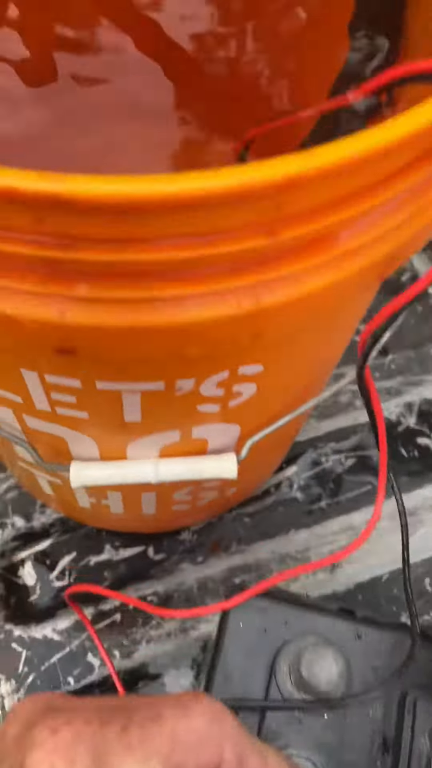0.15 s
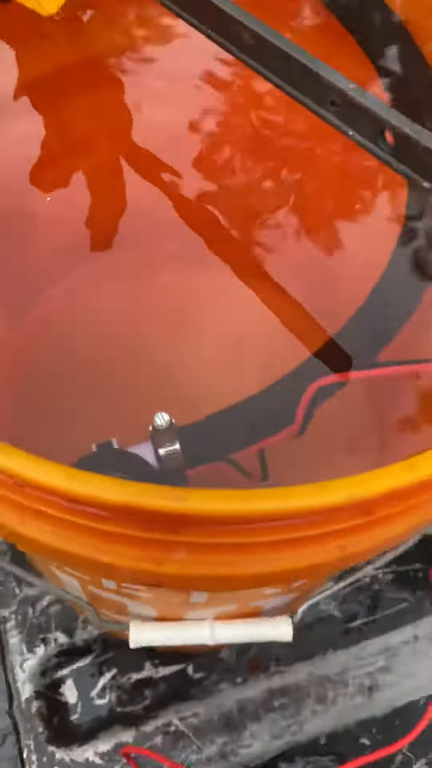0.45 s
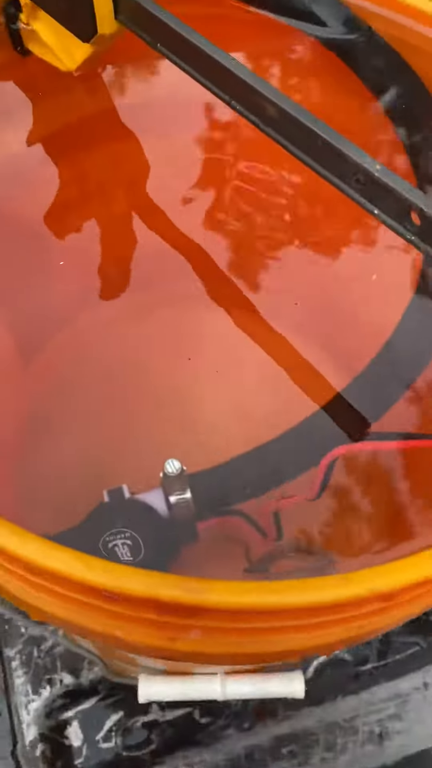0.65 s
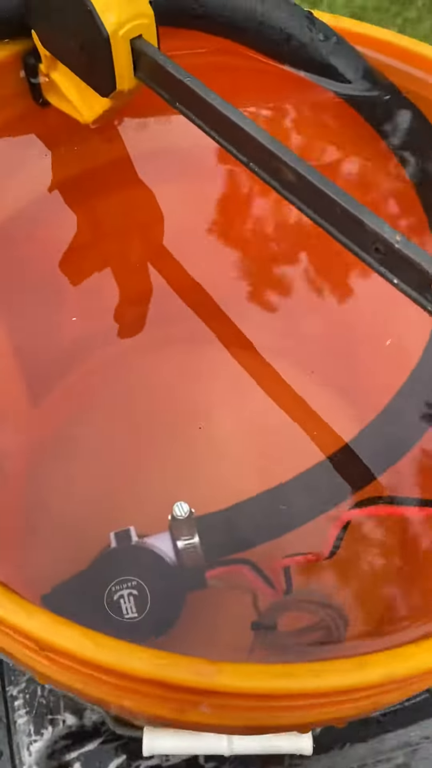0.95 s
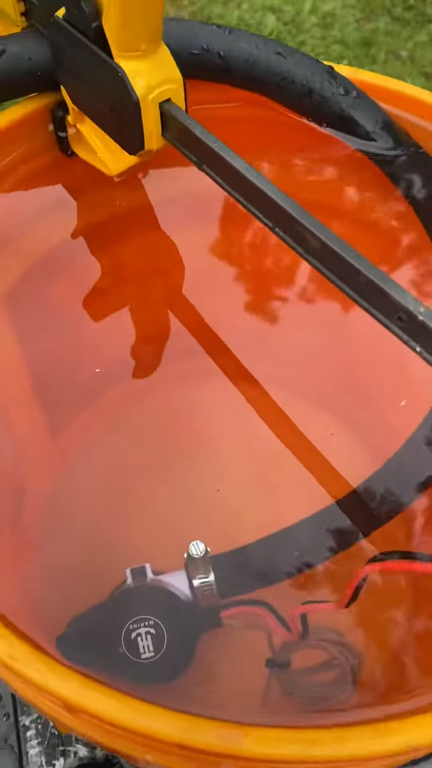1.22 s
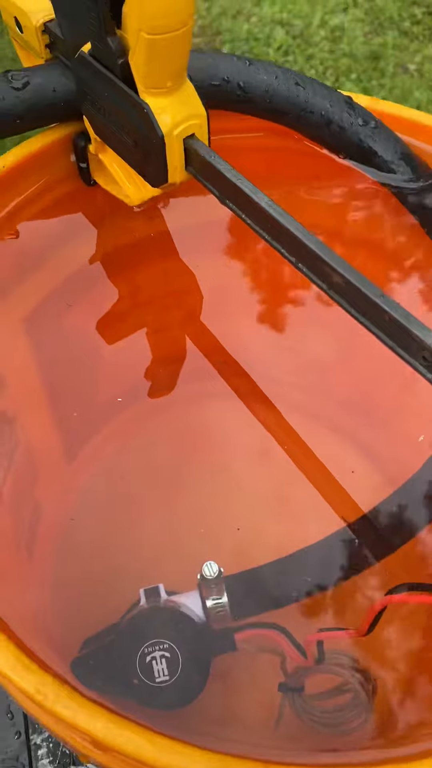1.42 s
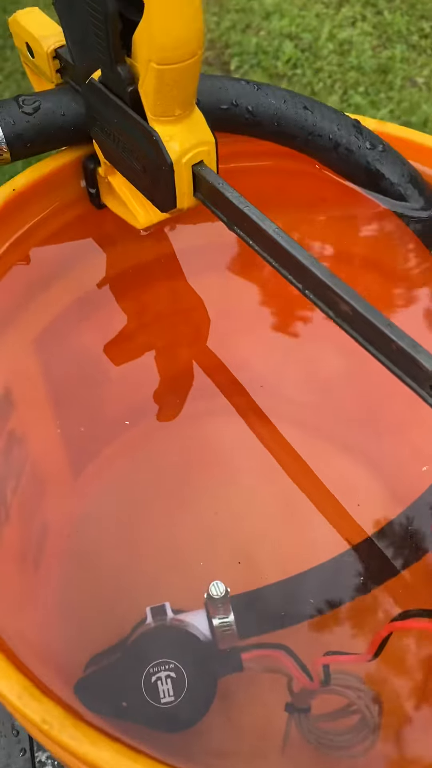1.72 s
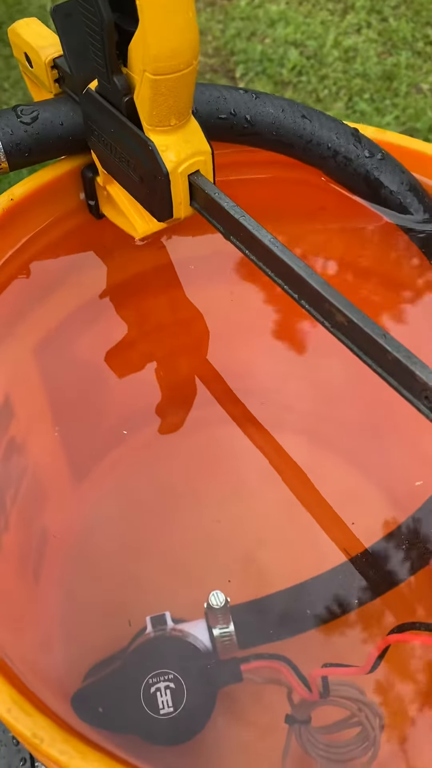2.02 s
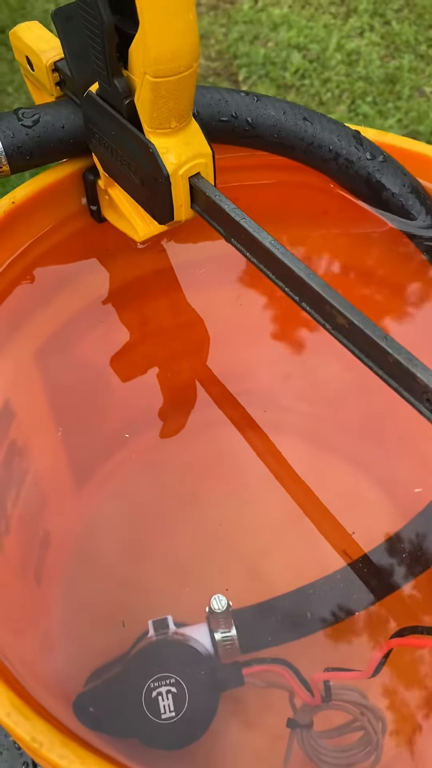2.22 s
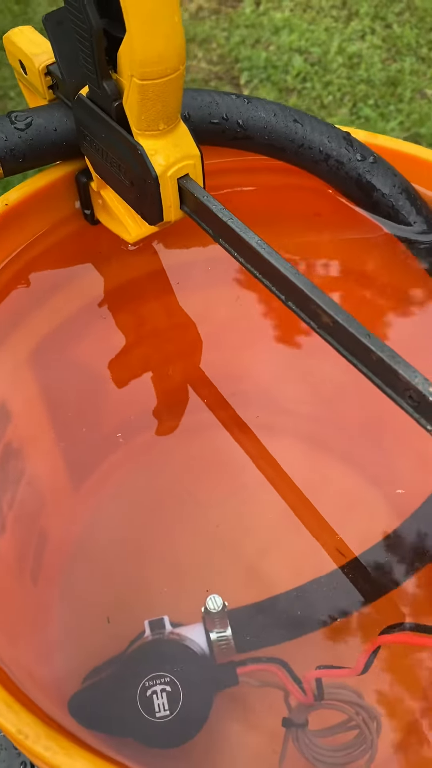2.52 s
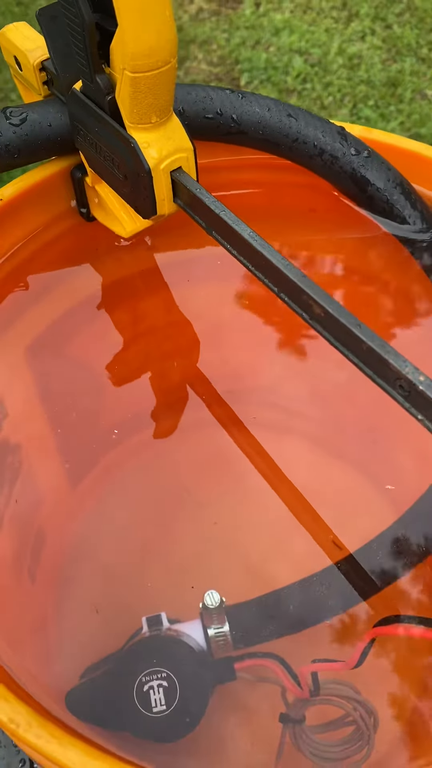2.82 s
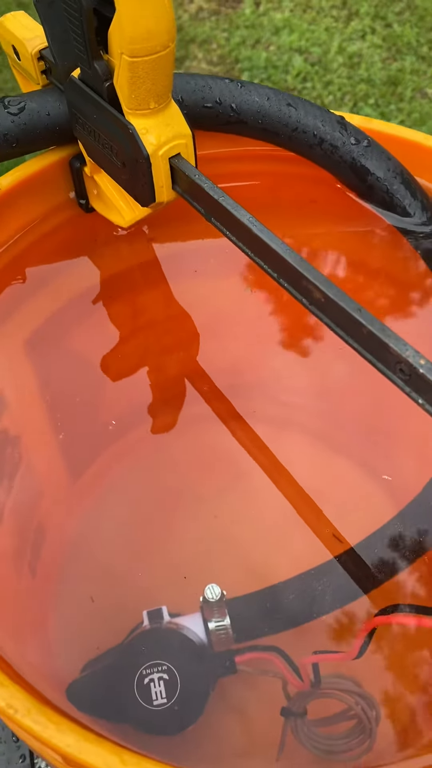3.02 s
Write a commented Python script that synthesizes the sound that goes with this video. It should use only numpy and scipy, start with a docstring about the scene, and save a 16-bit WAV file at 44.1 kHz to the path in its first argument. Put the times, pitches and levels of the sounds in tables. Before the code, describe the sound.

A small electric pump hums in a plastic bucket of water for the whole three seconds, with a hollow churn, faint whine and soft fizz from the hose. At about 0.1 seconds a wire terminal gives a quick, louder double knock on a battery post, then crackles until about 0.3 seconds. The pump runs on steadily, with a few faint ticks and small bubbles, the clearest around 2.3 seconds.

```python
"""A low hum and watery churn: a small electric bilge pump runs in a plastic bucket of water, outdoors.
Its shaft hums, the churned water booms in the bucket and the hose stream fizzes, with a few bubbles.
Just after the start a wire terminal gives a quick double knock on the battery post,
then crackles as it is pressed home."""
import sys
import numpy as np
from scipy import signal
from scipy.fft import rfft, irfft
from scipy.io import wavfile

SR = 44100
rng = np.random.default_rng(int(sys.argv[2]) if len(sys.argv) > 2 else 0)


def unload_wav(signal):
    """Save mono or channel-first audio to the path in sys.argv[1] as 16-bit WAV at rate SR, clipped to [-1, 1]."""
    wavfile.write(
        sys.argv[1],
        SR,
        np.round(np.clip(np.atleast_2d(signal).T, -1, 1) * 32767).astype(np.int16),
    )


N = 139356
TIME, FREQ = np.arange(N) / SR, np.fft.rfftfreq(N, 1 / SR)

# motor speed: time_s, turns_per_s
SHAFT_SPEED = [(0, 54.1), (.25, 54.55), (.75, 54.75), (1.2, 54.87), (1.45, 55.08), (2.3, 55.05),
               (3.16, 55.07)]
# partials of the hum: shaft_multiple, level_db, unsteadiness (0-1), fade_db_per_s
HUM_PARTIALS = [(1, -55, .7, 0), (2, -42.8, .36, 0), (3, -60, .6, 0), (4, -53, .6, 0), (5, -52, .6, 1),
                (7, -54, .8, 0), (8, -53.5, .5, 0), (12, -65, .4, -1.5), (14, -51, .6, 4),
                (20, -50.5, .15, .5), (22, -60.5, .4, -.3)]
# the hum swells at the knocks, ducks just after, then recovers and holds nearly steady: time_s, gain_db
HUM_FADER = [(0, -2), (.1, 4.5), (.2, -8.5), (.4, -5.5), (.7, 0), (1.3, 1.5), (1.7, 0.5), (2.2, -1.5),
             (3.16, -0.5)]
# thin motor whines: pitch_hz, width_hz, level_db, fade_db_per_s
WHINES = [(2820, 220, -59, 0), (3150, 160, -62, -1), (5480, 200, -69, 0), (7400, 100, -69, 0),
          (8920, 90, -69, -1.5), (9570, 110, -62, 3)]
# resonances of bucket and pump: pitch_hz, width_hz, level_db, fade_db_per_s
BUCKET_MODES = [(50.4, 6.1, -57, -2.5), (74.7, 7.5, -57.5, -4), (221, 33, -51, 0), (271, 44, -54, -0.5),
                (348, 35, -55, -2), (402, 92, -51.5, -1), (450, 29, -52, 0.5), (540, 43, -56.5, 1.3),
                (670, 60, -54.5, -0.5), (1028, 190, -50, 0.5), (1213, 120, -55.5, 0.5),
                (1864, 88, -53.5, -0.6), (2060, 370, -49, 0.55)]
# strength of the churning: time_s, gain_db
CHURN_FADER = [(0, -1.5), (.2, 0), (.3, 2), (.8, 1.5), (1.2, 0.4), (1.63, 0.7), (1.8, -1), (2.1, -0.5),
               (2.5, -2), (3.16, -3.5)]
# the water column's drone, swelling and sinking: time_s, level_db
DRONE_FADER = [(0, -41.5), (.12, -43), (.26, -50), (.43, -41), (.6, -47.5), (.85, -45.5), (1.1, -50.5),
               (1.5, -56), (1.63, -38.5), (1.76, -46), (2, -48.5), (2.12, -46.5), (2.37, -56),
               (2.56, -43.5), (2.85, -50.5), (3.16, -45)]
# the bucket's hollow ring comes in quickly, holds, then wavers away: time_s, level_db
HOLLOW_FADER = [(0, -75), (.2, -48), (.9, -48.5), (1.6, -47.5), (2.1, -53.5), (2.33, -45.5), (2.55, -61),
                (2.7, -52.5), (3.16, -68)]
# broad rumble of moving water: freq_hz, density_db
RUMBLE_EQ = [(20, -100), (35, -96), (50, -73.5), (130, -65.5), (190, -71), (340, -78), (500, -75),
             (590, -84.5), (820, -74), (890, -81), (1300, -77.5), (1700, -78), (2200, -95), (2600, -100),
             (5000, -125)]
# fizz of the stream: freq_hz, density_db
FIZZ_EQ = [(300, -100), (2000, -86), (2550, -83), (3050, -81), (4500, -80.7), (5500, -85), (6100, -88.5),
           (7300, -88.7), (8400, -90), (9500, -89.7), (10100, -94), (12000, -94.2), (14300, -92.3),
           (15700, -93.5), (15950, -120)]
# fader on the fizz as the microphone comes over the rim: time_s, gain_db
FIZZ_FADER = [(0, -5.5), (.09, -2.5), (.25, -1.5), (.6, -2), (1.1, 0.14), (2, 0.1), (3.16, 0)]
# terminal hits on the post: start_s, level_db, contact_s, tilt_db_per_octave, ping_gain_db, ping_hz
POST_HITS = [(.0983, -4, 0.0027, 3.5, -6.5, 3400), (0.1086, -6.5, 0.0023, 1, 0, 3080)]
# ring of the battery case: pitch_hz, gain_db, t60_s
CASE_MODES = [(1480, -16, 0.014), (2000, -3.5, 0.0096), (2543, -10.5, .016), (3670, -11, 0.017),
              (4350, -25, .012), (4800, -29, 0.013)]
# low thud of the heavy battery: pitch_hz, gain_db, t60_s
THUD_MODES = [(95, -32, 0.17), (242, -23, 0.051), (389, -26, 0.061), (536, -27.5, 0.22), (778, -28.5, 0.12),
              (1223, -20.5, 0.03)]
# contact crackles and ticks: start_s, level_db, hold_s, tilt_db_per_octave, ring_gain_db
CONTACT_TICKS = [(.1052, -25, .0035, 4, -20), (.126, -29, .0018, -12, -6), (.1404, -35.5, .005, 9, -25),
                 (.1752, -32, .0022, -2, -6), (.1895, -30, .0015, 4.5, -12), (.1982, -23, .0036, -1.5, 2),
                 (.2046, -31, .0012, -2, -2), (.2109, -22, .0012, -9, 3), (.2133, -24, .0008, -4, 4),
                 (.2721, -28, .0015, 2.5, 0), (.2795, -34, .003, -1, -6), (.292, -33, .002, 1, -5),
                 (.3003, -32, .0008, 10, -20), (.3161, -26, .0008, 4, -6), (.3203, -31, .002, 2, 2),
                 (.437, -36, .001, 4, -15), (.819, -35.5, .0008, 8, -20), (.9445, -36.5, .005, 0, -12),
                 (1.386, -45, .001, 20, -30)]
# tone colour of a crackle: freq_hz, gain_db
CRACKLE_EQ = [(500, -31), (2100, -7.5), (2600, 0), (3100, 2), (3900, -1), (4800, 0.5), (5700, -1),
              (6800, 2), (9300, -6), (10800, -14.5), (15500, -20)]
# ring of the scraped metal terminal: pitch_hz, gain_db, t60_s
TERMINAL_MODES = [(2837, -5, 0.016), (4720, -8, 0.028), (5450, -7.5, 0.019)]
# single bubbles: start_s, ring_db, pitch_hz, plop_db
BUBBLE_CUES = [(.0668, -26, 2090, -38), (.3813, -35, 2090, -42), (.7237, -37, 1700, -33.5),
               (.808, -35, 1860, -39), (2.032, -33, 1900, -42), (2.2808, -23, 1900, -36),
               (2.2888, -29, 1870, -37), (2.292, -33.5, 1160, -41), (2.496, -39, 4550, -50)]
# stereo image at the two microphone ports: freq_hz, left_lead_rad, likeness (0-1)
PORT_IMAGE = [(20, 0, 1), (200, 0, .999), (550, -.2, .93), (750, 0, .96), (1100, 0, .98), (2100, 0, .99),
              (2400, .4, .65), (2700, 1.65, .68), (3600, 1.2, .7), (4600, 1.1, .7), (5000, .35, .78),
              (5400, .55, .78), (6000, 1.65, .68), (6600, 3.02, .98), (7300, 3.14, .998), (8000, 3.3, .98),
              (8600, 4.3, .72), (9900, 6.2, .99), (10900, 6.3, .99), (11900, 7.5, .62), (12700, 9.3, .98),
              (13500, 9.42, .997), (14200, 9.55, .97), (15000, 10.8, .6), (16000, 12.2, .75)]
# image of the knocks, arriving from close below: freq_hz, left_lead_rad, left_minus_right_db
KNOCK_IMAGE = [(200, 0, 0), (650, -.3, 4), (1050, -1.2, -7), (1500, -.4, -8), (2000, .55, 0),
               (2500, 1.2, -5), (3100, 1.75, 2), (3800, 2.6, 3), (5000, 0, 0)]


def motor(wobble=.0019, wobble_hz=22.3, flutter_hz=7.2, whine_onset_s=.4):
    """Shaft harmonics flutter as water moves around the pump; thin whines fade in on top."""
    turns = np.cumsum(curve(SHAFT_SPEED) * (1 + wobble * drift(wobble_hz))) / SR
    hum = np.zeros(N)
    for multiple, db, unsteady, fade_db in HUM_PARTIALS:
        steady = np.sqrt(2 * (1 - unsteady ** 2))
        flutter = unsteady * (drift(flutter_hz) + 1j * drift(flutter_hz))
        tone = np.exp(2j * np.pi * (multiple * turns + rng.random()))
        hum += amp(db - fade_db * TIME) * ((steady + flutter) * tone).real
    whine = band_stack(WHINES) * np.minimum(TIME / whine_onset_s, 1)
    return np.array([hum * amp(curve(HUM_FADER)), np.zeros(N)]) + whine


def churn(flicker_db=2):
    """Turbulence from the impeller drives the bucket's resonances over a broad rumble."""
    boom = band_stack(BUCKET_MODES)
    drone = noise_band(hz=390, width_hz=27) * amp(curve(DRONE_FADER))
    hollow = noise_band(hz=767.4, width_hz=31.6) * amp(curve(HOLLOW_FADER))
    strength_db = curve(CHURN_FADER)
    rumble = noise(amp(spectrum(RUMBLE_EQ, FREQ))) * amp(strength_db)
    return boom * amp(strength_db + flicker_db * drift(rate_hz=23.5)) + drone + hollow + rumble


def fizz(flicker_db=1.43):
    """The hose stream hisses, grainy with tiny bursts."""
    hiss = noise(amp(spectrum(FIZZ_EQ, FREQ))) * amp(curve(FIZZ_FADER))
    grain = unit(amp(flicker_db * drift(rate_hz=340)))
    return hiss * grain


def knocks(rise_s=.0009, pivot_hz=2000):
    """Terminal on post: the case rings, the battery thuds, the post's ping depends on where it is hit."""
    out, t = np.zeros(N), TIME[:SR // 5]
    for start_s, db, contact_s, tilt_db, ping_db, ping_hz in POST_HITS:
        case = sum(amp(gain + tilt_db * np.log2(hz / pivot_hz)) * ring(t, hz, rise_s, contact_s, t60)
                   for hz, gain, t60 in CASE_MODES)
        thud = sum(amp(gain) * ring(t, hz, rise_s, contact_s, t60) for hz, gain, t60 in THUD_MODES)
        ping = amp(ping_db) * ring(t, ping_hz, rise_s, contact_s, t60=.012)
        add(out, start_s, amp(db) * (case + thud + ping))
    freqs, lead, pan_db = np.transpose(KNOCK_IMAGE)
    lead, pan = np.interp(FREQ, freqs, lead), amp(np.interp(FREQ, freqs, pan_db))
    placement = np.array([pan, np.exp(-1j * lead)]) * np.sqrt(2 / (1 + pan ** 2))  # constant power
    return irfft(rfft(out) * placement, N)


def wire(crack_gain_db=-22, rise_s=.0005, pivot_hz=4000):
    """The contact cracks at each knock, then scrapes and crackles with a small metallic ring."""
    out, t = np.zeros((2, N)), TIME[:SR // 5]
    for start_s, db, contact_s, *_ in POST_HITS:
        add(out, start_s, amp(db + crack_gain_db) * crackle(rise_s, contact_s, tilt_db=0, t60=.009))
    for start_s, db, hold_s, tilt_db, ring_db in CONTACT_TICKS:
        metal = sum(amp(gain + tilt_db * np.log2(hz / pivot_hz)) * ring(t, hz, rise_s, hold_s, t60)
                    for hz, gain, t60 in TERMINAL_MODES)
        add(out, start_s, amp(db) * crackle(rise_s, hold_s, tilt_db, t60=.0075))
        add(out[0], start_s, amp(db + ring_db) * metal)
    return out


def crackle(rise_s, hold_s, tilt_db, t60):
    """One burst of tiny scrapes and sparks, its treble tilted brighter or duller."""
    size = SR // 10
    t, hz = TIME[:size], np.fft.rfftfreq(size, 1 / SR)
    corner_hz = CRACKLE_EQ[1][0]
    colour = amp(spectrum(CRACKLE_EQ, hz) + tilt_db * np.log2(np.maximum(hz, corner_hz)))
    grit = unit(irfft(rfft(rng.standard_normal((2, size))) * colour, size))
    return grit * np.minimum(t / rise_s, 1) * decay(t, hold_s, t60)


def bubbles(rise_s=.001, hold_s=.003, t60=.016):
    """Each bubble opens with a dull plop and rings for a moment at its own pitch."""
    out, t = np.zeros((2, N)), TIME[:SR // 10]
    for start_s, ring_db, hz, plop_db in BUBBLE_CUES:
        plop = noise_band(hz=1550, width_hz=1300)[0, :len(t)]
        plop *= np.minimum(t / rise_s, 1) * decay(t, hold_s, t60)
        add(out[0], start_s, amp(plop_db) * plop + amp(ring_db) * ring(t, hz, rise_s, hold_s, t60))
    return out


def echoes(pair, send_db=-17, predelay_s=.003):
    """Short stereo scatter off the bucket and the deck it stands on, fed from the first channel."""
    t = TIME[:SR // 4]
    tail = rng.standard_normal((2, len(t))) * decay(t, hold_s=0, t60=.09) * (t > predelay_s)
    return amp(send_db) * signal.fftconvolve(pair[:1], tail / np.linalg.norm(tail[0]), axes=1)[:, :N]


def ports(pair):
    """Spreads a mid/side pair over the two microphone ports, with a phase lag between them."""
    freqs, lead, likeness = np.transpose(PORT_IMAGE)
    lead, likeness = np.interp(FREQ, freqs, lead), np.interp(FREQ, freqs, likeness)
    mid, side = rfft(pair) * np.sqrt([(1 + likeness) / 2, (1 - likeness) / 2])
    return irfft([mid + side, (mid - side) * np.exp(-1j * lead)], N)


def ring(t, hz, rise_s, hold_s, t60):
    """A mode that swells briefly, holds and dies away, peak 1."""
    envelope = (1 - np.exp(-(t / rise_s) ** 2)) * decay(t, hold_s, t60)
    return envelope / envelope.max() * np.sin(2 * np.pi * hz * t)


def decay(t, hold_s, t60):
    """Holds at 1, then falls 60 dB every t60 seconds."""
    return amp(-60 * np.maximum(t - hold_s, 0) / t60)


def band_stack(bands):
    """Layered noise bands, each fading at its own rate; a negative fade swells."""
    return sum(amp(db - fade_db * TIME) * noise_band(hz, width) for hz, width, db, fade_db in bands)


def noise_band(hz, width_hz):
    """A noise pair of rms 1 in a band around hz."""
    return unit(noise(1 / np.sqrt(1 + (2 * (FREQ - hz) / width_hz) ** 4)))


def noise(gain):
    """Two unrelated noises with the given amplitude per root Hz."""
    return irfft(rfft(rng.standard_normal((2, N))) * gain, N) * np.sqrt(SR / 2)


def drift(rate_hz):
    """Random modulation of rms 1, rolled off above rate_hz."""
    return unit(irfft(rfft(rng.standard_normal(N)) / (1 + (FREQ / rate_hz) ** 4), N))


def curve(points):
    """Automation: (time_s, value) points joined at every sample."""
    return np.interp(TIME, *np.transpose(points))


def spectrum(points, hz):
    """EQ curve: (freq_hz, value) points joined on a log-frequency axis."""
    freqs, values = np.transpose(points)
    return np.interp(np.log(hz + 1), np.log(freqs + 1), values)


def amp(db):
    """Decibels to gain."""
    return 10 ** (np.asarray(db) / 20)


def unit(x):
    """Scales to rms 1."""
    return x / np.sqrt(np.mean(abs(x) ** 2) + 1e-20)


def add(mix, start_s, sound):
    """Mixes a sound in at start_s."""
    part = mix[..., round(start_s * SR):][..., :sound.shape[-1]]
    part += sound[..., :part.shape[-1]]


def scene():
    """Pump, water and wire in stereo; only the knocks, crackles and bubbles feed the echoes."""
    hits, clicks = knocks(), wire() + bubbles()
    bed = motor() + churn() + fizz()
    return ports(bed + clicks) + hits + echoes(hits + clicks)


def record(dry, cutoff_hz=16500):
    """A steep low-pass trims the very top."""
    lowpass = signal.firwin(511, cutoff_hz, window=("kaiser", 9), fs=SR)
    return signal.oaconvolve(dry, lowpass[None], "same")


dry = scene()
out = record(dry)
unload_wav(out)
```